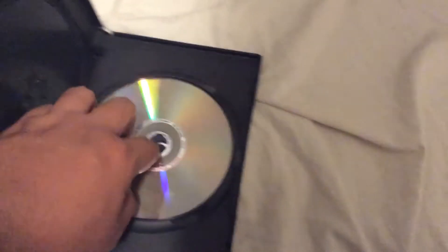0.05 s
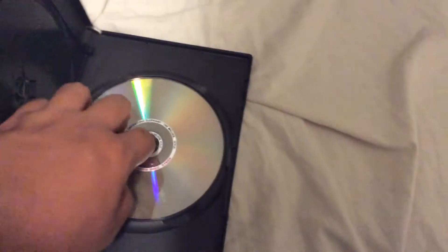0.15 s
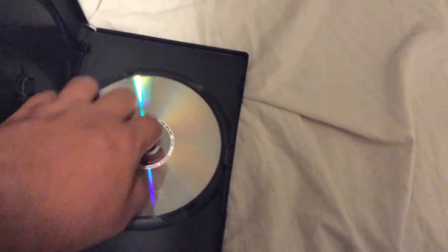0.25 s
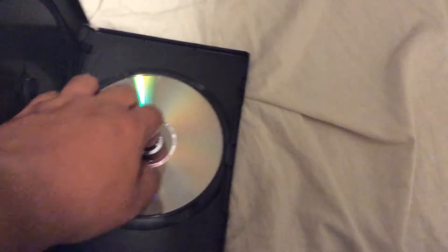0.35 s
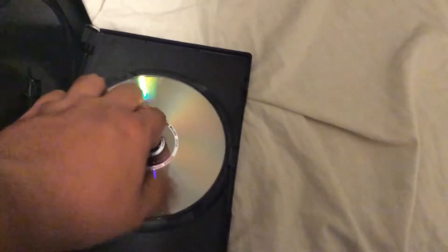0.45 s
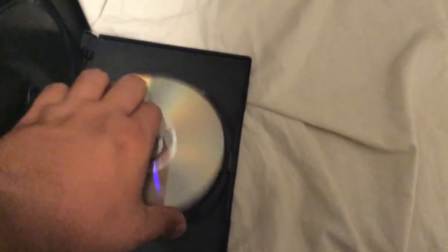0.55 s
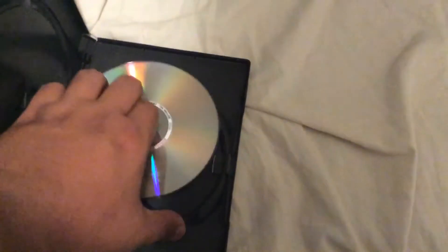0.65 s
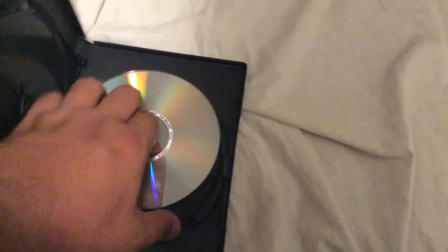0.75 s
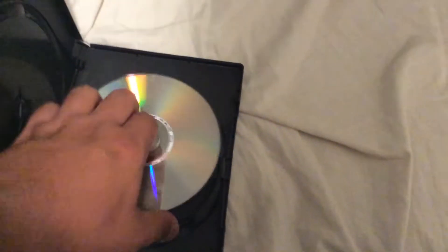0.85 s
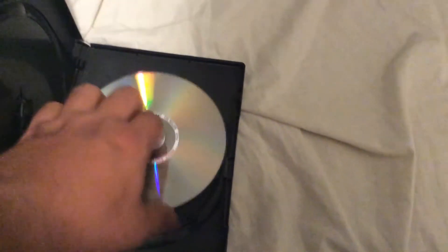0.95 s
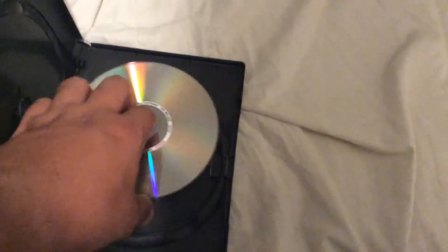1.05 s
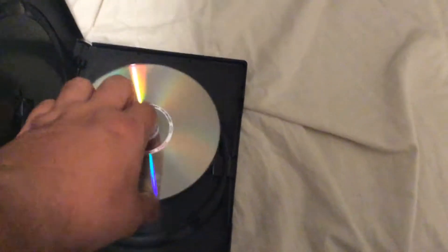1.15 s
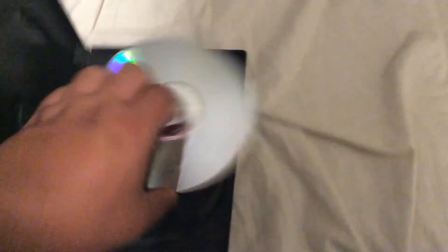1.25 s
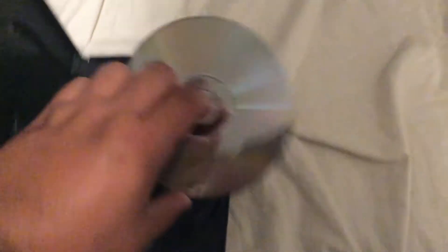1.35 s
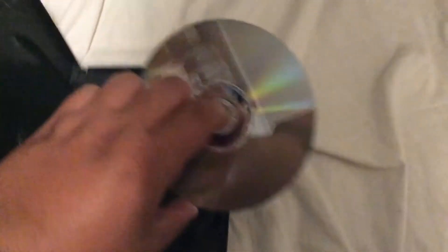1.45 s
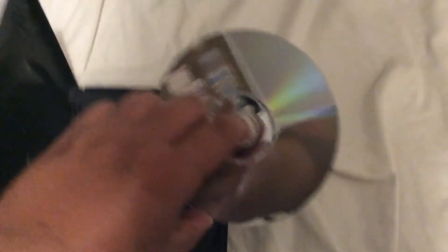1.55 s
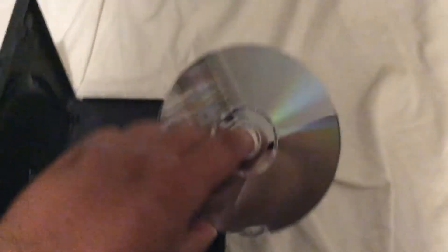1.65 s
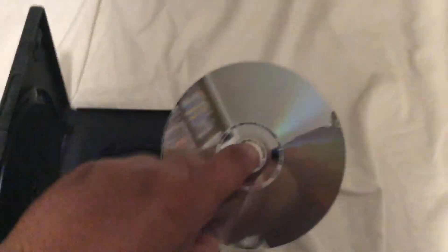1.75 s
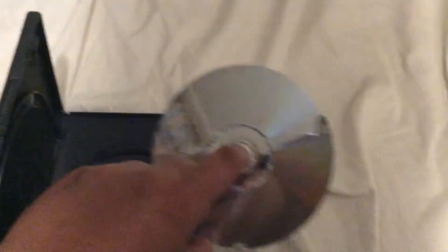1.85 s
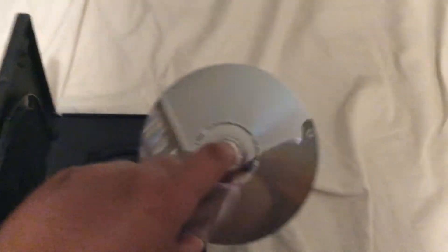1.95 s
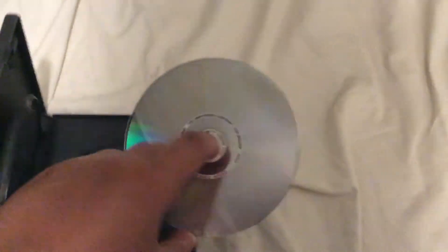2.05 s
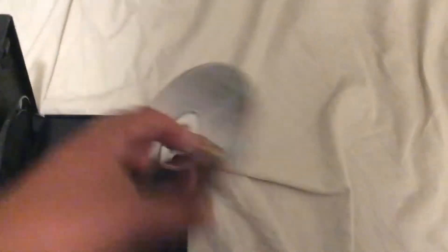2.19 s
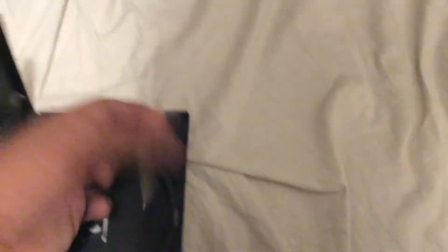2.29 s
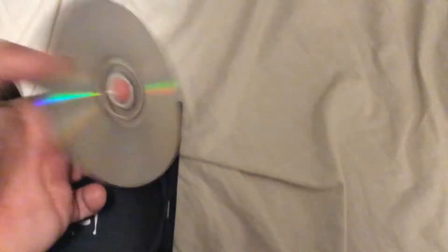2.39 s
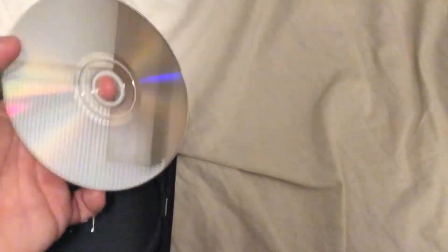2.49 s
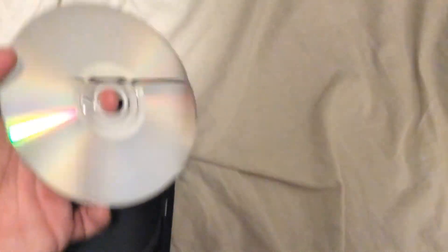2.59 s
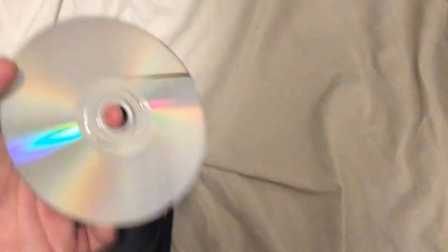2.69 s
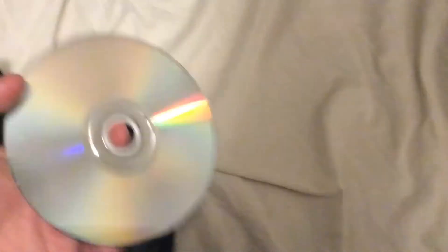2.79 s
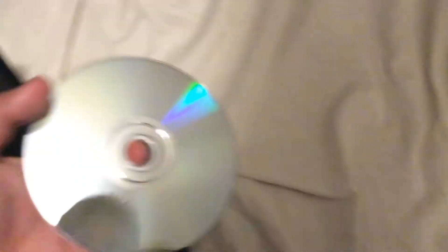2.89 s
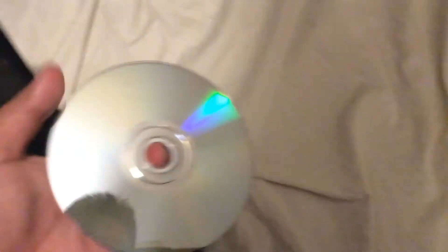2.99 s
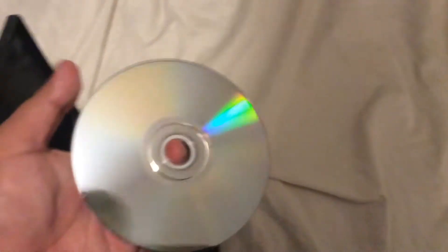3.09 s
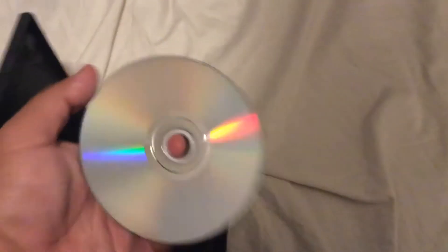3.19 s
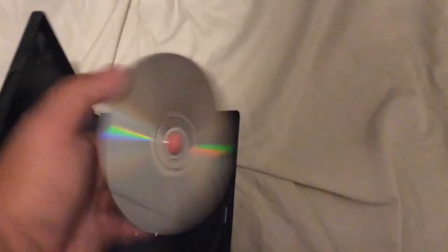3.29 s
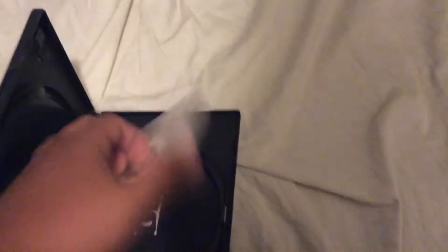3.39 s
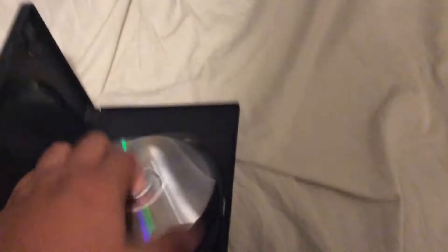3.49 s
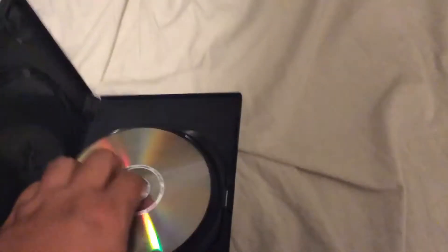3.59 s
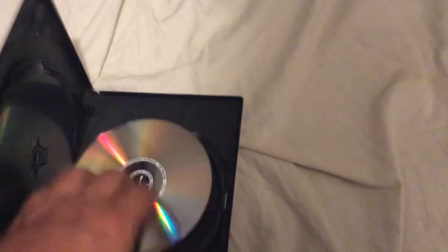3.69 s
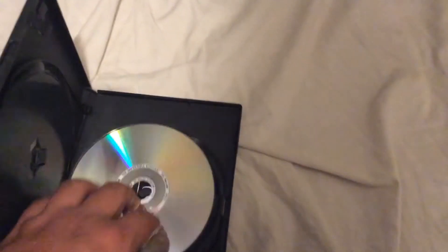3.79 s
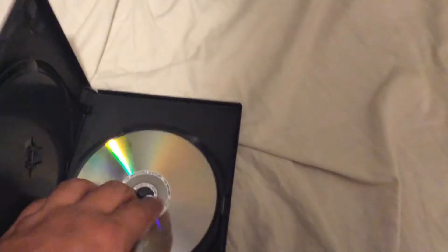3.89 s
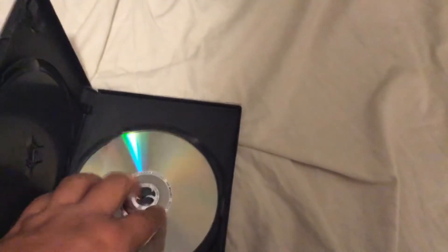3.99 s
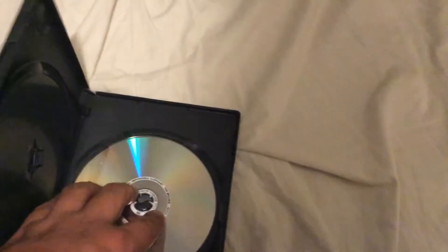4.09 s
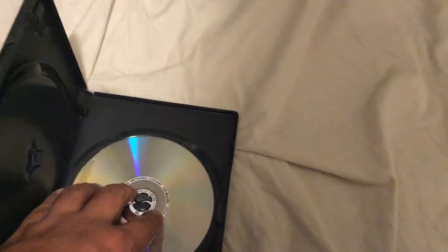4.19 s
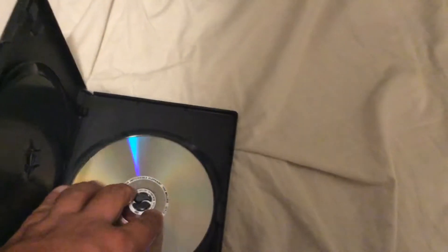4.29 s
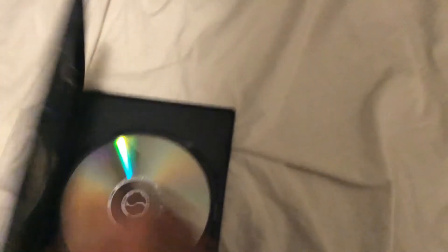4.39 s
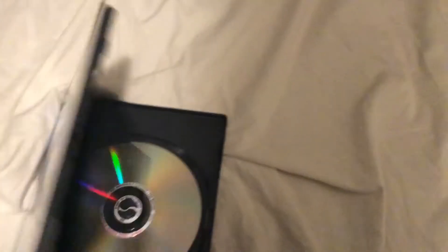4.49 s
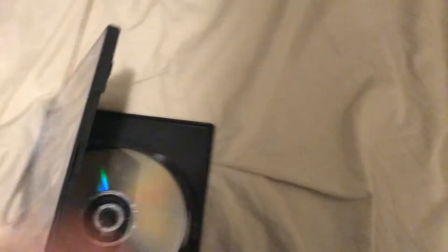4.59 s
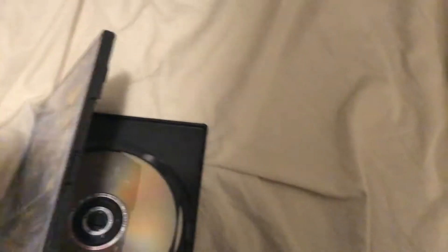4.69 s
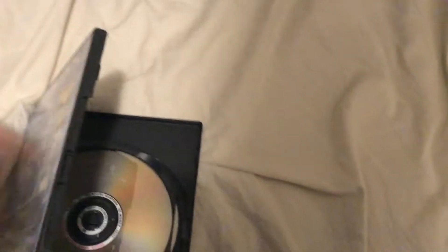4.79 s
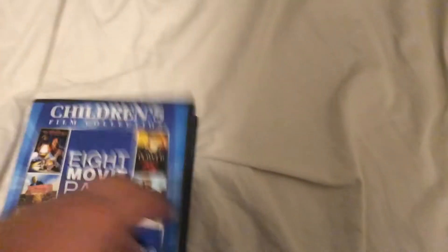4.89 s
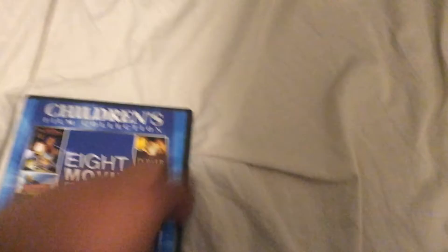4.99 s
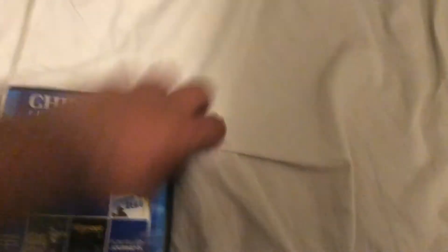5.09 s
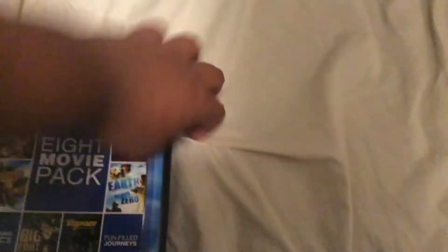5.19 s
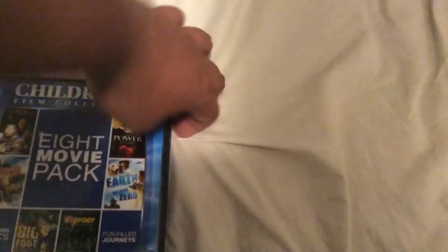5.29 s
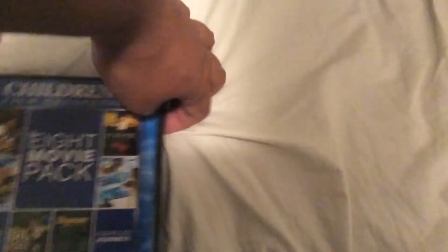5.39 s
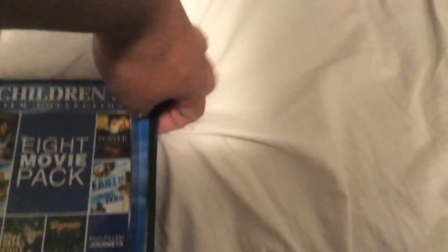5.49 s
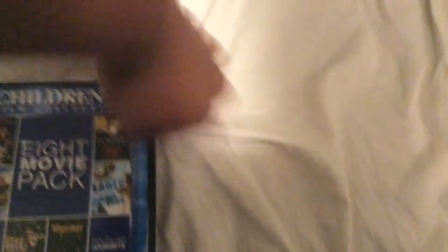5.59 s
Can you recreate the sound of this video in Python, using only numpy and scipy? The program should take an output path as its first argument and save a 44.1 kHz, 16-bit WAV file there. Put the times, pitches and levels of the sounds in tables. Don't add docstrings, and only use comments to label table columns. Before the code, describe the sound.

A disc is snapped on and off the hub of a thin plastic case with sharp clicks and faint rubs, then the lid shuts.

```python
import sys
import numpy as np
from scipy import signal
from scipy.fft import rfft, irfft, next_fast_len
from scipy.io import wavfile
from scipy.ndimage import uniform_filter1d

SR = 44100
rng = np.random.default_rng(int(sys.argv[2]) if len(sys.argv) > 2 else 0)


def attenuation_scalar(level_db):
    decades = np.asarray(level_db, float) / 20
    return 10 ** decades


def waveform_to_disk(signal):
    frames = np.transpose(np.atleast_2d(signal))
    scaled = np.clip(frames, -1, 1) * 32767
    samples = np.round(scaled).astype(np.int16)
    wavfile.write(sys.argv[1], SR, samples)


N = 249165

# t/s, peak level/dB, ring of touched part f/Hz, burst length/ms
CRISP = [(.078, -49.5, 1410, 3.5), (.12, -47, 1520, 3.7), (.134, -30, 1960, 3.8), (.194, -60, 2700, 2),
         (.366, -55.5, 2410, 3.5), (.376, -55, 2450, 3), (.388, -13.5, 2600, 3.3), (.634, -36, 2700, 5.3),
         (.645, -34.5, 3800, 2.4), (.6872, -25.5, 4220, 7.3), (1.004, -66, 2300, 3.4),
         (1.058, -36.5, 3930, 6.1), (2.149, -54.5, 3240, 8.6), (2.868, -58.5, 4930, 15),
         (3.41, -34, 2340, 4.6), (3.624, -36.5, 2260, 4.8), (3.763, -38, 2160, 7.2), (3.77, -29, 3840, 4.6),
         (3.791, -27, 2090, 5.3), (4.016, -50.5, 2760, 9.5), (4.046, -41.5, 3780, 4.6),
         (4.465, -64, 1220, 9.2), (4.6605, -11, 3900, 3.16), (4.663, -18, 1505, 14),
         (4.883, -32.5, 1490, 8.7), (4.895, -33, 1420, 10), (4.998, -37.5, 1400, 1.24),
         (5.086, -54.5, 3100, 4.1), (5.477, -45.5, 1355, 3.1)]
# t/s, peak level/dB, ring f/Hz, burst length/ms
THIN = [(.653, -36, 3900, 4.7), (.664, -32.5, 3070, 6.8), (1.067, -34, 2410, 4.9),
        (1.132, -49.5, 2110, 1.5), (2.177, -49, 3900, 3.5), (2.189, -49.5, 2520, 15),
        (2.302, -55.5, 3130, 6), (2.329, -47, 4030, 1.7), (2.335, -51, 5470, 27), (3.456, -45.5, 2360, 3.7),
        (3.598, -33, 2410, 8.9), (3.919, -34.5, 3800, 5.7), (4.053, -32, 3300, 3.6),
        (4.2155, -11.5, 2150, 2.5), (5.027, -43.5, 1200, 10.5), (5.502, -34, 6380, 8.8)]
# t/s, peak level/dB, ring f/Hz, burst length/ms
DULL = [(.57, -57, 3530, 36), (.591, -47.5, 2830, 6), (.601, -41.5, 1270, 5.8), (.705, -30, 3070, 0.92),
        (.714, -36, 4030, 5), (.77, -53, 2090, 18), (.994, -38, 2090, 5.1), (1.034, -45, 2070, 41),
        (1.143, -50, 2130, 6.6), (3.814, -50, 3870, 5.4), (3.885, -47, 2050, 29),
        (3.904, -34.5, 2900, 11.5), (4.043, -31.5, 2150, 3.5)]
# t/s, peak level/dB, ring f/Hz, burst length/ms
BLUNT = [(.072, -34.5, 1510, 3.3), (.697, -30, 3053, 15), (.72, -44, 2170, 3.2), (.758, -39, 2000, 6.1),
         (3.662, -33, 2480, 10.6), (3.753, -24.5, 2800, 7.9), (3.784, -31, 3800, 4.4),
         (3.7935, -19, 2130, 2.6), (3.895, -53.5, 3590, 15), (3.955, -51, 1940, 15),
         (4.104, -45.5, 2050, 4.3), (4.142, -28.5, 1247, 9), (4.211, -12, 1890, 6.7),
         (4.214, -21.5, 950, 7.3)]
# t/s, peak level/dB, ring f/Hz, burst length/ms
FLAT = [(.101, -52, 2150, 4.5), (.967, -59, 2970, 3.3), (1.075, -37, 3870, 3.2), (1.151, -55, 2130, 5),
        (3.591, -44.5, 2590, 3.4), (3.673, -52.5, 2600, 12), (4.033, -46, 2200, 8),
        (4.134, -28.5, 2000, 10.5), (4.208, -30.5, 1960, 4.1), (4.419, -49, 2070, 3.1),
        (4.639, -49.5, 1770, 57), (4.871, -45.5, 1440, 15), (5.006, -36.5, 1500, 9.4),
        (5.141, -42, 1500, 2.34), (5.206, -59.5, 2650, 10.5), (5.491, -19, 745, 8.3)]
# events, thump level/dB, fizz level/dB (both relative to the mid panels)
CONTACTS = [
    (CRISP, -9, -2),
    (THIN, -37.5, -6),
    (DULL, 0.4, -21),
    (BLUNT, -12.5, -15.5),
    (FLAT, 0.5, -6.5),
]
# f/Hz, width/Hz, level/dB
CASE_MODES = [(705, 100, 6.5), (840, 64, 9), (1370, 300, 6.5), (2150, 370, 7.5), (2980, 460, -1),
              (3800, 530, -0.5), (5000, 93, -19.5), (5640, 1700, -0.5)]
# f/Hz, width/Hz, level/dB
LID_MODES = [(285, 170, 4), (770, 190, 6), (1450, 420, 7), (2150, 360, 4.5), (2950, 310, -1.5),
             (3900, 240, 4.5), (5200, 490, -10), (6630, 1700, -2)]
# f/Hz, width/Hz, level/dB
EDGE_MODES = [(6470, 5400, 14), (8400, 1900, 12.5)]
# t/s, length/s, share before firmest point/0-1, level/dB, ring f/Hz
RUBS = [(0, 0.11, 0, -58.5, 3900), (.17, 0.26, .5, -62, 5500), (0.777, 0.18, 0.4, -67, 4000),
        (0.591, 0.06, 0.3, -46.5, 2980), (0.626, 0.052, 0.2, -38, 3150), (.74, 0.032, 0.8, -52, 3900),
        (0.932, 0.12, 0.85, -49.5, 2150), (1.076, 0.2, 0.85, -67, 3900), (2.149, .09, 0.3, -55.5, 5840),
        (2.272, 0.28, 0.09, -55.5, 3110), (2.567, 0.21, 0.06, -62.5, 4350), (2.75, 0.59, 0.2, -71.5, 9300),
        (3.168, 0.35, 0.24, -67, 5500), (3.413, 0.077, 0, -51.5, 2380), (3.501, 0.075, 0.82, -57.5, 2230),
        (3.607, 0.12, 0.66, -50, 2250), (3.711, 0.042, 0.39, -40, 2560), (3.88, 0.039, 0.7, -54, 2080),
        (3.94, 0.27, .95, -57.5, 3900), (4.394, 0.085, .1, -54.5, 2120), (5.008, 0.35, 0, -56.5, 2490)]
# f/Hz, level/dB per Hz
RUB_COLOUR = [(180, -31.5), (300, 2), (725, 0.5), (1010, -7.5), (2030, -6), (2440, -15.5), (2930, -6),
              (5340, -0.5), (16000, -29)]
# t/s, peak level/dB, f/Hz, t60/s
THUDS = [(0.073, -39.5, 296, 0.034), (0.136, -39.5, 280, 0.043), (0.386, -32, 173, 0.065),
         (.634, -39.5, 212, 0.06), (0.993, -23.5, 238, 0.014), (1.057, -42.5, 236, 0.08),
         (3.623, -44, 228, 0.19), (3.789, -38, 189, 0.13), (3.906, -34, 200, 0.018),
         (4.043, -34.5, 347, 0.051), (4.133, -32.5, 151, 0.031), (4.209, -24.5, 161, 0.017),
         (4.421, -37.5, 266, 0.037), (4.657, -26.5, 102.3, 0.14), (4.873, -19.5, 138, 0.018),
         (5.005, -34.5, 170, 0.062), (5.142, -38.5, 387, 0.023), (5.49, -32, 116, 0.16),
         (5.493, -40, 288, 0.028)]
# f/Hz, t60/s
ROOM_T60 = [(150, 0.27), (500, 0.23), (1500, 0.26), (4000, 0.27), (9000, 0.29), (15000, 0.28)]
# delay t/s, level/dB
ECHOES = [(.004, -20), (.007, -14), (0.01, -24), (0.015, -17.5)]
# f/Hz, level/dB per Hz
AIR_COLOUR = [(12, -46), (20, -22.5), (53, -12.5), (85, 1), (125, -1.5), (168, -14.5), (241, -14),
              (300, -22.5), (660, -21.5), (2320, -30.5), (3340, -38), (8180, -42.5), (13000, -43.5),
              (16000, -58.5)]
# f/Hz, width/Hz, level/dB
DUCTS = [(374, 84, -65.5), (2090, 520, -71.5)]
# f/Hz, level/dB
MIC = [(100, 0), (8000, 0), (12000, -1), (15500, -3), (16400, -9), (16900, -70), (22050, -80)]

LID_FROM_S = 4.5
SHAKE_DB_PER_DB, SHAKE_FROM_DB = 0.19, 1
LANDING_DB, LIFTING_DB, RUB_BRIGHT_DB = -19.5, -14, 0
RUB_RING_DB, RUB_RING_WIDTH_HZ = -8.5, 170
CATCHES_PER_S, CATCH_DB, CATCH_DECAY_S = 260, 3, 0.0016
ROOM_DB, AIR_DB = -4.5, -53


def snaps():
    out = np.zeros((2, N))
    for rows, thump_db, fizz_db in CONTACTS:
        chances = rng.standard_normal((len(rows), 2048))
        for (s, db, ring_hz, length_ms), chance in zip(rows, chances):
            sound = snap(s, db, thump_db, fizz_db, ring_hz, length_ms, chance)
            send_db = np.clip(SHAKE_DB_PER_DB * (db - SHAKE_FROM_DB), -9, 0)
            add(out[0], s, sound)
            add(out[1], s, sound * attenuation_scalar(send_db))
    return out


def snap(s, db, thump_db, fizz_db, ring_hz, length_ms, chance):
    slips = slips_of(chance, length_ms, np.clip((db + 46) / 16, 0, 1))
    modes = CASE_MODES if s < LID_FROM_S else LID_MODES
    panels = sum(attenuation_scalar(g) * resonate(slips, f, w) for f, w, g in modes)
    body = panels + .45 * band(slips, 200, 8000)
    ring = np.interp(db, [-30, -14], [.7, .4]) * peaked(resonate(slips, ring_hz, 300))
    wide = peaked(band(band(body, 1000, 9000), 1100, 6800))
    damped = np.clip((-fizz_db - 5) / 12, 0, .7)
    mid = (1 - damped) * wide + damped * peaked(resonate(wide, ring_hz, 1000)) + ring
    low = peaked(band(band(body, 170, 1150), 100, 1300))
    edges = -band(slips, 6500, 15000)
    fizz = peaked(edges + sum(attenuation_scalar(g) * resonate(edges, f, w) for f, w, g in EDGE_MODES))
    return attenuation_scalar(db) * (peaked(mid) + attenuation_scalar(thump_db) * low + attenuation_scalar(fizz_db) * fizz)


def slips_of(chance, length_ms, hard):
    t = np.arange(len(chance)) / SR
    length_s = np.clip(length_ms, .7, 30) / 1000
    creep = np.minimum(t / (0.0001 + 0.59 * (1 - hard) * length_s), 1)
    shape = creep * np.exp(-(t / length_s) ** 2)
    release = 1 + 0.35 * hard * np.exp(-((t - .0007) / 0.0003) ** 2)
    slips = chance * abs(chance) ** .5 * shape * release
    for _ in range(3):
        z = rfft(slips)
        slips = irfft(z / np.sqrt(uniform_filter1d(abs(z) ** 2, size=19) + 1e-9)) * shape ** 0.08
    return slips


def rub_grit():
    clumps = evened(uniform_filter1d(rng.standard_normal(N), size=200))
    grit = coloured(RUB_COLOUR) * attenuation_scalar(np.clip(2.5 * clumps, -6, 5))
    catches = (rng.random(N) < CATCHES_PER_S / SR) * np.minimum(rng.exponential(1, N), 3)
    decay = np.exp(-np.arange(300) / (CATCH_DECAY_S * SR))
    return grit * (1 + attenuation_scalar(CATCH_DB) * signal.oaconvolve(catches, decay)[:N])


def rubs():
    t, out = np.arange(N) / SR, np.zeros(N)
    grit = rub_grit()
    dull = band(grit, 400, 7000) + .8 * sum(resonate(grit, f, w) for f, w, _ in CASE_MODES[3:])
    dull = dull / np.std(band(dull, 1700, 10000))
    bright = evened(band(grit, 7000, 22000))
    for s, length_s, share, db, ring_hz in RUBS:
        end_s = s + length_s
        near = (t > s - .01) & (t < end_s + .01)
        on = np.clip(np.minimum(t[near] - s, end_s - t[near]) / .008 + .5, 0, 1)
        firm_s = s + length_s * np.clip(share, .02, .98)
        press_db = np.interp(t[near], [s, firm_s, end_s], [LANDING_DB, 0, LIFTING_DB])
        ring = attenuation_scalar(RUB_RING_DB) * evened(resonate(dull[near], ring_hz, RUB_RING_WIDTH_HZ))
        out[near] += on * attenuation_scalar(db + press_db) * (dull[near] + ring + attenuation_scalar(RUB_BRIGHT_DB) * bright[near])
    return out


def thuds():
    out, t = np.zeros(N), np.arange(6000) / SR
    for s, db, hz, t60 in THUDS:
        onset = 1 - np.exp(-t / 0.00064)
        add(out, s, attenuation_scalar(db - 60 * t / t60) * np.sin(2 * np.pi * hz * t) * onset * 1.2)
    return out


def room(x):
    t, out = np.arange(N) / SR, np.zeros(N)
    for k in range(3):
        taps = np.zeros(SR // 2)
        at = np.arange(350, SR // 2 - 12, 12)
        taps[at + rng.integers(0, 12, len(at))] = rng.choice([-1., 1.], len(at))
        hz, tt, z = signal.stft(taps, SR, nperseg=256)
        tail = signal.istft(z * attenuation_scalar(-60 * tt / read(ROOM_T60, hz)[:, None]), SR, nperseg=256)[1]
        turn = np.sqrt(2 / 3) * np.cos(2 * np.pi * (t * 3.1 + k / 3))
        out += signal.oaconvolve(x * turn, tail / np.linalg.norm(tail))[:N]
    out *= attenuation_scalar(ROOM_DB)
    for s, db in ECHOES:
        add(out, s, attenuation_scalar(db) * x)
    return out


def air():
    swell = evened(uniform_filter1d(rng.standard_normal(N), size=6000))
    white = rng.standard_normal(N)
    ducts = sum(attenuation_scalar(db) * evened(resonate(resonate(white, f, w), f, w)) for f, w, db in DUCTS)
    return attenuation_scalar(AIR_DB) * coloured(AIR_COLOUR) * attenuation_scalar(0.31 * swell) + ducts


def evened(x):
    return x / np.sqrt(np.mean(x ** 2) + 1e-20)


def peaked(x):
    return x / np.sqrt(uniform_filter1d(x ** 2, size=88).max() + 1e-20)


def read(points, hz):
    f, value = np.transpose(points)
    return np.interp(np.log(hz + 1), np.log(f + 1), value)


def add(mix, s, sound):
    part = mix[round(s * SR):][:len(sound)]
    part += sound[:len(part)]


def band(x, lo_hz, hi_hz):
    sos = signal.butter(2, [lo_hz, min(hi_hz, SR / 2.2)], "bandpass", fs=SR, output="sos")
    return signal.sosfilt(sos, x)


def resonate(x, hz, width_hz):
    pole = np.exp((2j * np.pi * hz - np.pi * width_hz) / SR)
    return 2 * signal.lfilter([1 - abs(pole)], [1, -pole], x + 0j).real


def coloured(points):
    size = next_fast_len(N)
    gain = attenuation_scalar(read(points, np.fft.rfftfreq(size, 1 / SR)))
    return evened(irfft(rfft(rng.standard_normal(size)) * gain, size)[:N])


def scene():
    direct, sent = snaps() + rubs()
    return (direct + room(band(sent, 210, 17000)) + thuds() + air())[None]


def top_cut(x):
    return signal.sosfilt(signal.butter(12, 16830, fs=SR, output="sos"), x)


def record(dry):
    hz = np.linspace(0, SR / 2, 200)
    mic = signal.firwin2(127, hz, attenuation_scalar(read(MIC, hz)), fs=SR)
    mix = signal.oaconvolve(np.clip(dry, -1, 1), mic[None], "same")
    return top_cut(mix)


dry = scene()
out = record(dry)
waveform_to_disk(out)
```